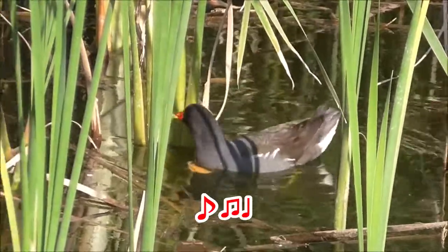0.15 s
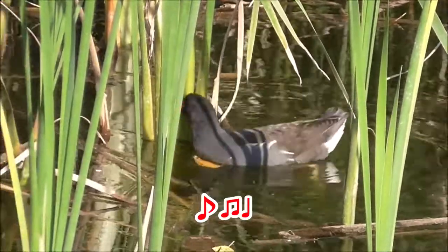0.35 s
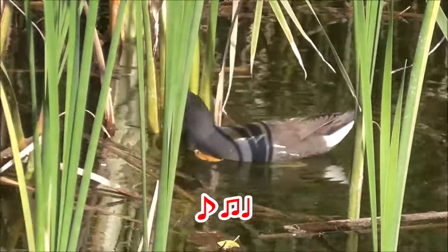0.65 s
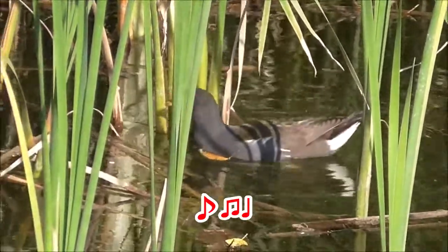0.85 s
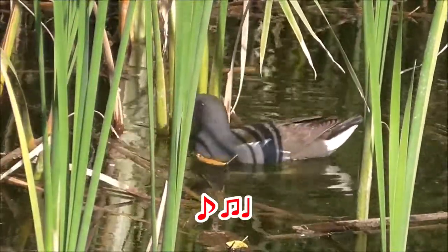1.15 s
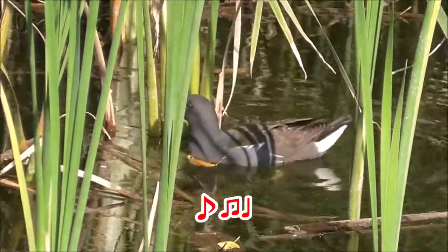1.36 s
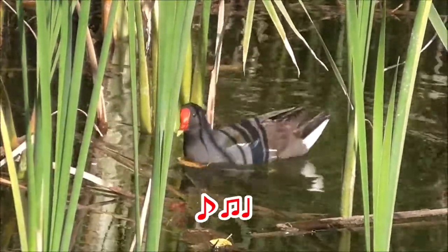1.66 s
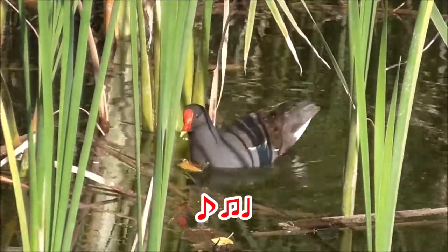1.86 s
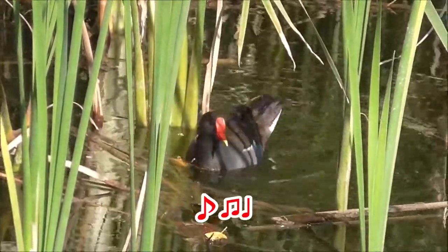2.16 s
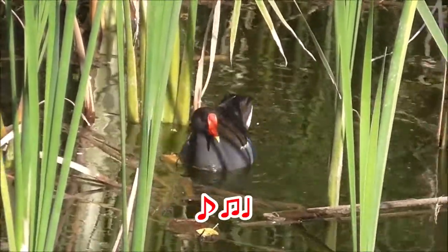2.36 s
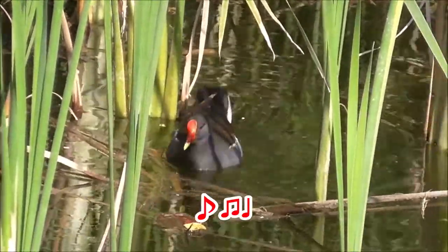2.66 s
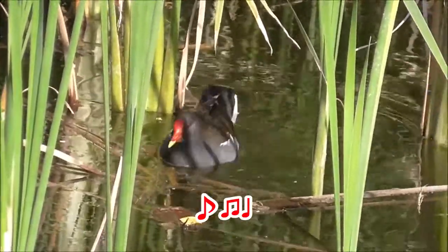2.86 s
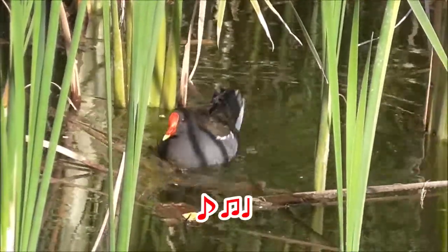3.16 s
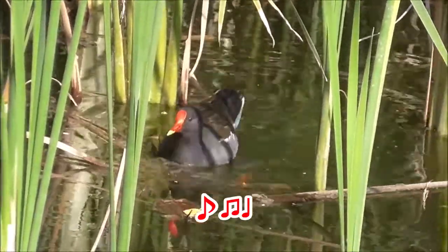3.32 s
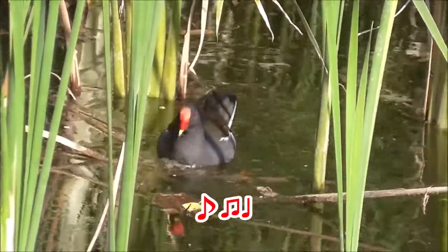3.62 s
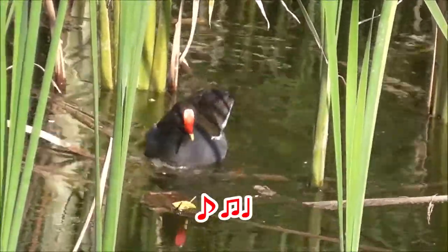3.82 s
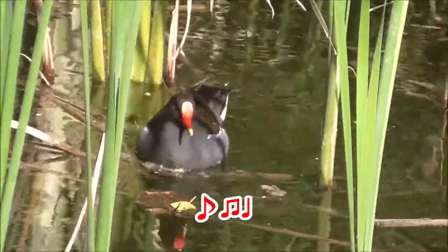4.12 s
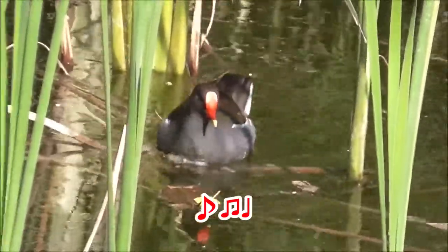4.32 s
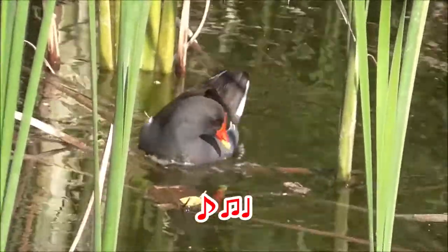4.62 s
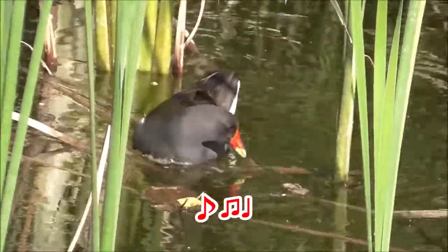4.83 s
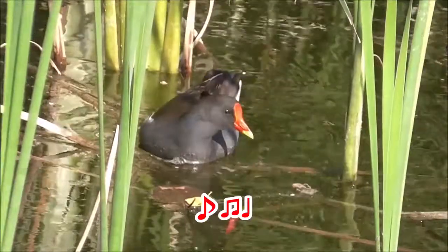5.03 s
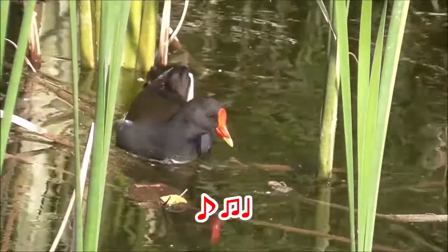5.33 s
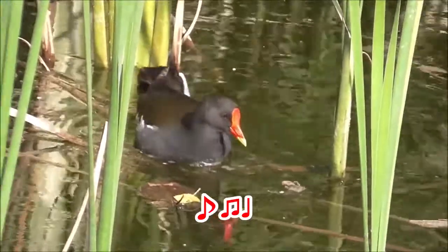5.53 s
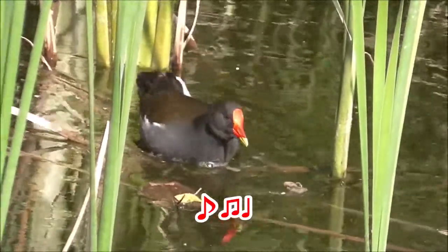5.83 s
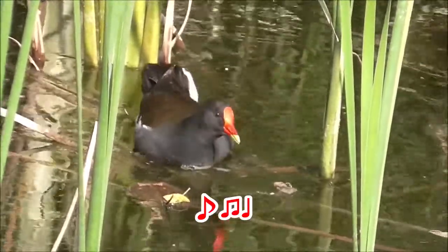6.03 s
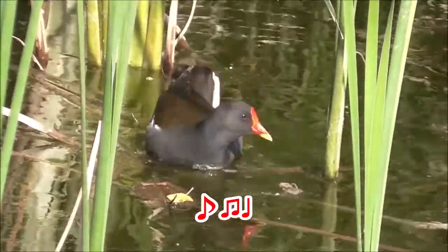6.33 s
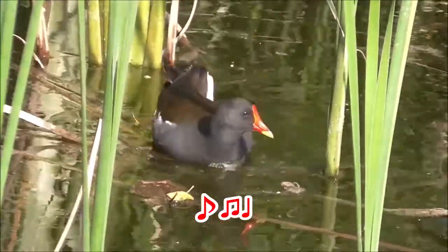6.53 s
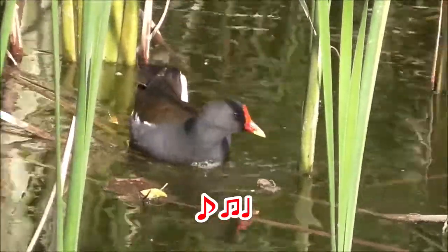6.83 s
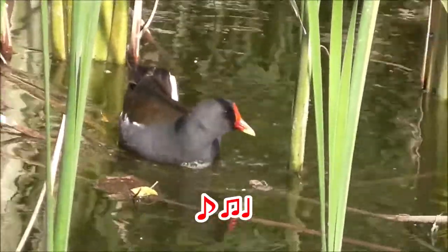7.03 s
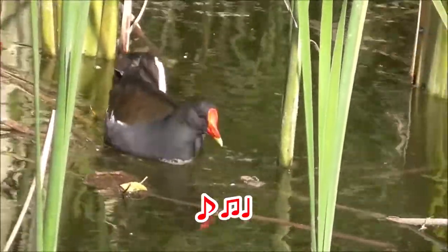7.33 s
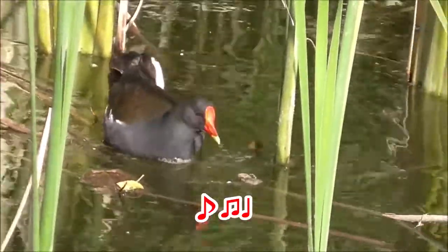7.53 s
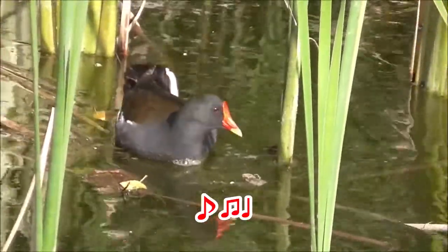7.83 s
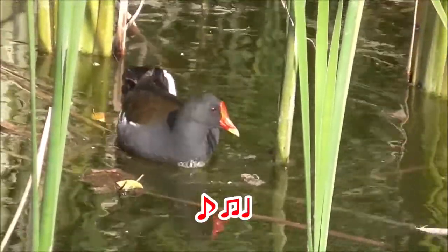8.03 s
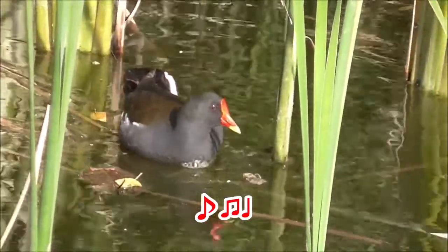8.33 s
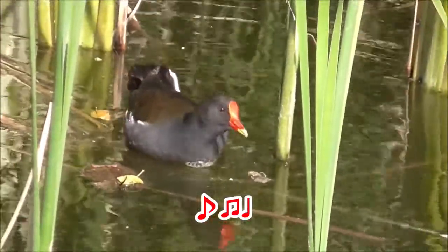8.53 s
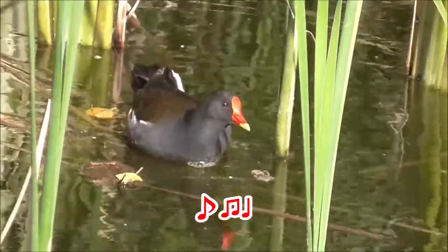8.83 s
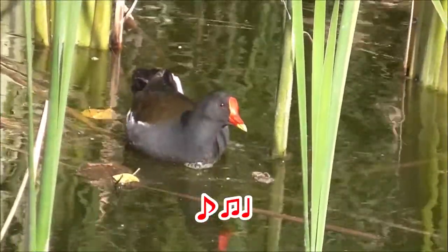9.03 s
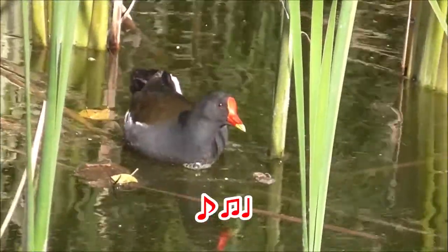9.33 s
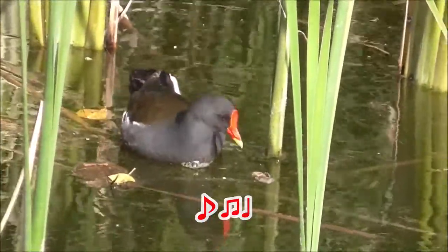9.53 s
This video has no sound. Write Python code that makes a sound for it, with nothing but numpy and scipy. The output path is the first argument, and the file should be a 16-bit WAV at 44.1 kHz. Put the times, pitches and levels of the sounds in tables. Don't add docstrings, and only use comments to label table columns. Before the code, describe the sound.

A water bird gives short, sharp clucks among pond reeds while cicadas hiss steadily and a small bird repeats thin whistles early on.

```python
import sys
import numpy as np
from scipy import signal
from scipy.io import wavfile
from scipy.ndimage import uniform_filter1d

SR = 44100
rng = np.random.default_rng(int(sys.argv[2]) if len(sys.argv) > 2 else 0)


def put_to_file(sound):
    columns = np.atleast_2d(sound).T
    safe = np.clip(columns, -1, 1)
    whole_steps = np.round(safe * 32767)
    wavfile.write(sys.argv[1], SR, whole_steps.astype(np.int16))


def gain_from_db(level_db):
    decades = np.asarray(level_db, float) / 20
    return 10 ** decades


N = 426447

# pitch_hz, level_db
TRAFFIC_SPECTRUM = [(18, -50), (30, -36), (87, -9), (135, -5), (173, -5), (309, -0.5), (367, -5), (794, -5),
                    (1120, -13), (1500, -22.5), (3000, -38), (3900, -63), (6600, -120)]
# time_s, pitch_hz, level_db
DRONE_PATH = [(0, 298, -50), (.5, 307.5, -46), (1.6, 307.2, -52), (2.1, 303.7, -64), (2.5, 313, -48.5),
              (3.4, 312, -50.5), (4.0, 298, -54.5), (6.6, 293, -59), (7.5, 312.3, -49), (9.1, 297, -51),
              (9.67, 300, -58)]
# pitch_hz, level_db
CICADA_SPECTRUM = [(1530, -37), (2600, -45.5), (3660, -36.5), (4630, -19.5), (5190, -14.5), (5730, -6.5),
                   (6670, -3), (8070, 1.5), (8640, 0), (9610, -12.5), (10900, -30), (11400, -41.5),
                   (12600, -44.5), (14700, -35.5), (16000, -45)]
# pitch_hz, likeness (1 = same)
LEFT_RIGHT_LIKENESS = [(60, 0.93), (92, 0.99), (140, 0.9), (210, 1), (330, 0.92), (500, 0.92), (770, 0.94),
                       (1170, 0.58), (1790, 0.45), (2740, 0.19), (4190, 0.58), (6410, 0.96), (9810, 0.48),
                       (15000, -0.28)]
# pitch_hz, left_minus_right_db
LEFT_LOUDER = [(60, -1), (110, -1.5), (200, 0.5), (380, 1), (700, 2.5), (1290, 3), (2380, 0), (4400, 5),
               (8120, -1.5), (15000, -1)]
# pitch_hz, lead_radians
LEFT_AHEAD = [(0, 0), (950, 0.3), (1640, 0.0), (3960, 0.0), (4650, -0.1), (8100, 0.3), (8610, 0.5),
              (9470, 2.2), (9820, 2.2), (10800, 3.1), (13400, 3.1), (14400, 3.4), (14800, 5.9),
              (16000, 6.4)]
# start_s, end_s, pitch_hz, level_db, chirps_per_s
CRICKET_SONGS = [
    (0, 2.0, 5320, -69, 30),
    (1.6, 4.8, 5580, -43, 26),
    (4.3, 10.9, 5480, -55, 38),
    (4.399, 6, 5900, -43, 37),
    (6.1, 15, 5660, -53, 36),
]
# middle_s, level_db, pitch_hz, width_cycles, click_db
BODY_KNOCKS = [
    (7.6505, -22, 190, .7, -24),
    (7.6635, -15, 230, 0.75, -15),
    (6.925, -52, 2100, 5, -2),
]
# start_s, end_s, pitch_before_break_hz, pitch_after_break_hz, crest_db
WHISTLE_ARCHES = [(0.102, 0.171, 4640, 4740, -46), (0.319, 0.387, 4540, 4730, -46),
                  (0.537, 0.56, 3630, 3670, -70), (0.748, 0.815, 4360, 4920, -50),
                  (0.945, 1.02, 4300, 5060, -38), (1.159, 1.234, 4470, 5190, -34),
                  (1.379, 1.463, 4620, 5200, -34), (1.6, 1.682, 4680, 5290, -40),
                  (1.83, 1.919, 4600, 5350, -37), (2.069, 2.152, 4680, 5340, -39),
                  (2.333, 2.43, 5000, 5170, -38), (2.575, 2.657, 4710, 5230, -41),
                  (2.798, 2.879, 4650, 5350, -39), (3.025, 3.116, 4700, 5380, -38),
                  (3.281, 3.37, 4670, 5310, -40), (3.536, 3.622, 4540, 5310, -39),
                  (3.806, 3.889, 4610, 5300, -38), (4.067, 4.155, 4700, 5170, -39),
                  (4.333, 4.409, 4600, 5260, -37)]
# start_s, length_s, effort_db, second_overtone_db, third_overtone_db
CLUCK_CALLS = [(0.1435, 0.015, -26, -8, -23), (1.744, 0.016, -26.5, 0, -24),
               (2.7008, 0.014, -24.5, -3.5, -18), (2.97, 0.017, -25.5, -5, -22),
               (3.833, 0.0105, -22, -2, -22), (4.5603, 0.0096, -22.5, -2.5, -26),
               (5.301, 0.013, -22.5, -3, -17), (6.017, 0.0135, -20.5, -1, -18),
               (7.2618, 0.014, -24, -2.5, -24), (8.6115, 0.017, -24, -6, -24)]
# pitch_hz, decay_s
REED_DECAY = [(500, 0.081), (1700, 0.33), (3000, 0.25), (6000, 0.12)]


def evened(x):
    return x / np.sqrt(np.mean(x ** 2) + 1e-20)


def read(points, hz):
    table_hz, value = np.transpose(points)
    return np.interp(np.log(hz + 1), np.log(table_hz + 1), value)


def add(mix, start_s, sound):
    part = mix[max(round(start_s * SR), 0):][:len(sound)]
    part += sound[:len(part)]


def wander(size, span):
    smooth = max(int(span), 1)
    drift = uniform_filter1d(rng.standard_normal(size), smooth)
    return evened(uniform_filter1d(drift, smooth))


def crowd(spectrum, level_db, patchy_db, swell_db):
    frames, hz = N // 256 + 5, np.fft.rfftfreq(1024, 1 / SR)
    a, b, c, d, patches = rng.standard_normal((frames, 513, 5)).T
    patches = uniform_filter1d(patches, size=10, axis=0)
    patches = evened(uniform_filter1d(patches, size=16, axis=1))
    same = np.minimum(abs(read(LEFT_RIGHT_LIKENESS, hz)), 1)[:, None]
    left = a + 1j * b
    right = same * left + np.sqrt(1 - same ** 2) * (c + 1j * d)
    lead = read(LEFT_AHEAD, hz)
    port = (gain_from_db(read(LEFT_LOUDER, hz) / 2) * np.exp(.5j * lead))[:, None]
    z = np.array([left * port, right / port])
    z /= np.sqrt(1 + same * np.cos(lead)[:, None])
    z *= gain_from_db(read(spectrum, hz)[:, None] + patchy_db * patches + swell_db * wander(frames, 5.7))
    z *= gain_from_db(2.5 * (hz > 11000)[:, None] * wander(frames, 4))
    sound = signal.istft(z, nperseg=1024, noverlap=768)[1][:, :N]
    return gain_from_db(level_db) * sound / np.sqrt(np.mean(sound.mean(0) ** 2))


def traffic():
    start_db, rise_db_per_s = -40, 0.1962
    level_db = start_db + rise_db_per_s * np.arange(N) / SR
    return crowd(TRAFFIC_SPECTRUM, level_db, patchy_db=0.59, swell_db=0.56)


def drone():
    time_s, pitch_hz, level_db = np.transpose(DRONE_PATH)
    t = np.arange(N) / SR
    hz = np.interp(t, time_s, pitch_hz) + 4.07 * wander(N, 2390)
    level = gain_from_db(np.interp(t, time_s, level_db) + 2.0 * wander(N, 2600))
    return np.sqrt(2) * level * np.sin(2 * np.pi * np.cumsum(hz) / SR)


def cicadas():
    return crowd(CICADA_SPECTRUM, level_db=-28, patchy_db=0.27, swell_db=0.14)


def cricket(start_s, end_s, wing_hz, level_db, chirps_per_s):
    size = int((end_s - start_s) * SR)
    hz = wing_hz + 30 * wander(size, 288)
    chirps = np.cumsum(chirps_per_s * (1 + 0.061 * wander(size, 6400))) / SR
    scrape = (1 - 0.28 * np.cos(2 * np.pi * chirps)) * gain_from_db(1.6 * wander(size, 3000))
    song = evened(scrape * np.sin(2 * np.pi * np.cumsum(hz) / SR))
    return start_s, gain_from_db(level_db) * song * signal.windows.tukey(size, .4)


def knock(middle_s, level_db, hz, cycles, click_db):
    turns = np.arange(-400, 400) / SR * hz
    push = np.sin(2 * np.pi * turns) * np.exp(-(turns / cycles) ** 2)
    click = gain_from_db(click_db) * wander(len(turns), 18) * np.exp(-(turns / cycles / .7) ** 2)
    return middle_s - 400 / SR, gain_from_db(level_db) * (push + click)


def whistle(start_s, end_s, knee_hz, top_hz, top_db):
    foot_hz, climb_hz_per_s, floor_hz = 3400, 30000, 3250
    leg_db, warm_s, warm_db_per_s = -48.5, 1.15, 13
    beak_hz, beak_width_hz, beak_db = 4640, 150, 8
    crest_share, attack_share, release_share, edge_db = .6, .42, .2, -15

    t = np.arange(start_s, end_s, 1 / SR)
    snap_s = start_s + (knee_hz - foot_hz) / climb_hz_per_s
    climbing = t < snap_s
    phase = np.where(climbing, (t - snap_s) / (snap_s - start_s), (t - snap_s) / (end_s - snap_s))

    climb_hz = knee_hz - (knee_hz - foot_hz) * abs(phase) ** 1.8
    swoop_hz = np.clip(top_hz - knee_hz, 0, 150) * np.exp(-abs(phase) / .07)
    drop_hz = top_hz - swoop_hz - (top_hz - floor_hz) * abs(phase) ** 3.4
    arch_hz = uniform_filter1d(np.where(climbing, climb_hz, drop_hz), size=60)
    hz = arch_hz + 35 * wander(len(t), 50)

    cold_db = leg_db - warm_db_per_s * max(warm_s - start_s, 0)
    climb_db = leg_db + (cold_db - leg_db) * np.minimum(.3 + 2 * abs(phase), 1)
    climb_db += beak_db * np.exp(-((arch_hz - beak_hz) / beak_width_hz) ** 2)
    climb_db = np.minimum(climb_db, top_db + beak_db)
    tail_db = min((cold_db + leg_db) / 2, top_db)
    drop_db = top_db + (tail_db - top_db) / (1 + np.exp((crest_share - phase) / .05))
    fade_in = np.maximum(1 - (1 + phase) / attack_share, 0)
    fade_out = np.maximum(1 - (1 - phase) / release_share, 0)
    crest = (t >= snap_s) | (arch_hz > top_hz - 300)
    effort_db = uniform_filter1d(np.where(crest, drop_db, climb_db), size=130)
    effort_db += edge_db * (fade_in + fade_out) ** 1.5
    level = gain_from_db(effort_db + 1.3 * wander(len(t), 150))
    return start_s, gain_from_db(3.5) * level * np.sin(2 * np.pi * np.cumsum(hz) / SR)


def cluck(start_s, length_s, effort_db, second_db, third_db):
    usual_s = .0135
    start_hz = 735
    end_hz = 925 + 17000 * max(usual_s - length_s, 0)
    hum_db = -15.5 - 1500 * (length_s - usual_s)
    lead_s = .002

    t = np.arange(-lead_s, length_s + 0.019, 1 / SR)
    u = np.minimum(t / length_s, 1)
    hz = (start_hz + (end_hz - start_hz) * u) * (1 + .022 * wander(len(t), 40))
    turn = 2 * np.pi * np.cumsum(hz) / SR
    stir = np.sin(np.pi / 2 * np.clip((t + lead_s) / .007, 0, 1)) ** 2
    bill = np.sin(np.pi / 2 * np.clip(t / .0045, 0, 1)) ** 2
    hum = gain_from_db(hum_db) * u * np.exp(-(np.maximum(t - length_s, 0) / 0.018) ** 2)
    first = (stir * (1 - abs(u) ** 1.76) + hum) * np.sin(turn)
    second = gain_from_db(second_db) * (bill * (1 - abs(u) ** 3.0) + 0.24 * hum) * np.sin(2 * turn + 1.8)
    voice = (first + second) * gain_from_db(1.0 * wander(len(t), 51))

    snap = np.exp(-((t / length_s - .3) / 0.29) ** 2)
    high = gain_from_db(third_db + 2.2) * (np.sin(3 * turn) + gain_from_db(-17) * np.sin(4 * turn))
    skipped_cycles = gain_from_db(-13) * np.sin(1.6 * turn)
    air_puff = gain_from_db(-20) * wander(len(t), 11)
    return start_s - lead_s, gain_from_db(effort_db) * (voice + snap * (high + skipped_cycles + air_puff))


def reeds(x):
    echoes = np.zeros((2, SR // 2))
    slots = np.arange(200, SR // 2 - 40, 40)
    at = slots + rng.integers(0, 40, (2, len(slots)))
    np.put_along_axis(echoes, at, rng.choice([-1., 1.], at.shape), 1)
    hz, t, z = signal.stft(echoes, SR, nperseg=256)
    decay = gain_from_db(-60 * t / read(REED_DECAY, hz)[:, None])
    tail = signal.istft(z * decay, SR, nperseg=256)[1]
    return signal.fftconvolve(x[None], tail / np.linalg.norm(tail[0]), axes=1)[:, :N]


def scene():
    crickets, camera_body, small_bird, water_bird = np.zeros((4, N))
    for mix, source, rows in [(crickets, cricket, CRICKET_SONGS), (camera_body, knock, BODY_KNOCKS),
                              (small_bird, whistle, WHISTLE_ARCHES), (water_bird, cluck, CLUCK_CALLS)]:
        for row in rows:
            add(mix, *source(*row))
    background = traffic() + drone() + cicadas()
    insects = crickets * gain_from_db([[.6], [-.6]])
    birds = small_bird * gain_from_db([[1.0], [-1.0]]) + water_bird * gain_from_db([[.7], [-.7]])
    scatter = gain_from_db(-7.5) * reeds(small_bird) + gain_from_db(-12.5) * reeds(water_bird)
    return background + insects + camera_body + birds + scatter


def top_cut(x):
    return signal.sosfilt(signal.butter(12, 15790, fs=SR, output="sos"), x)


def record(dry):
    return top_cut(dry)


dry = scene()
out = record(dry)
put_to_file(out)
```